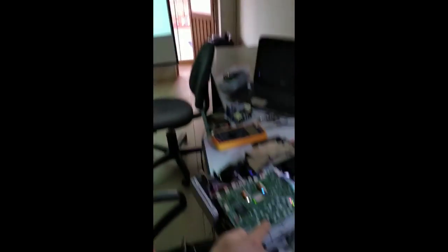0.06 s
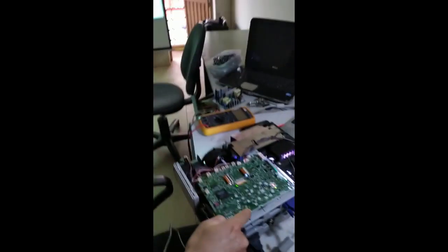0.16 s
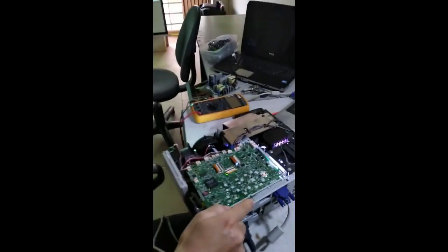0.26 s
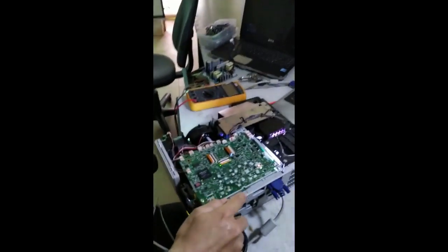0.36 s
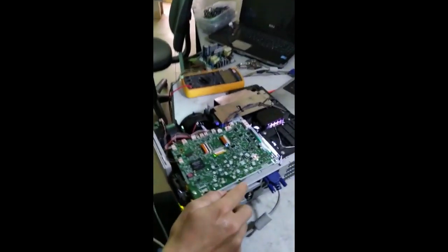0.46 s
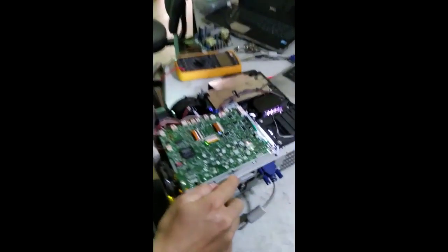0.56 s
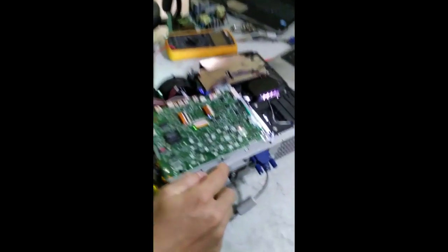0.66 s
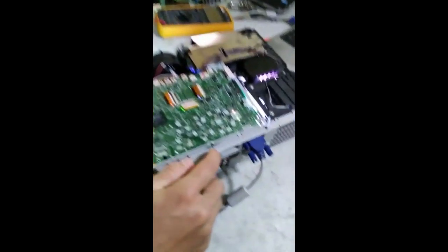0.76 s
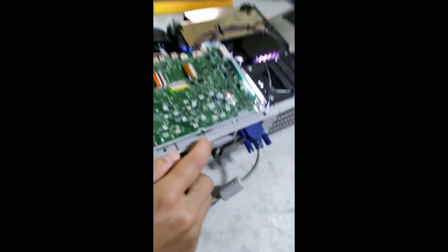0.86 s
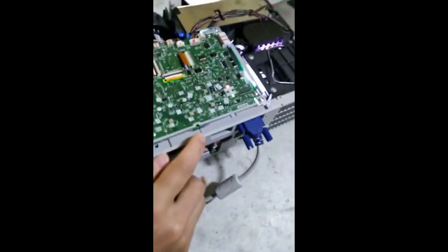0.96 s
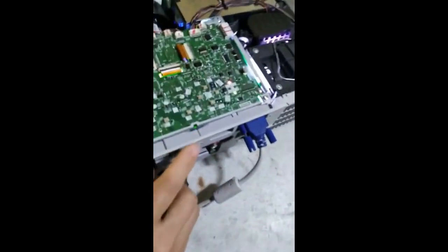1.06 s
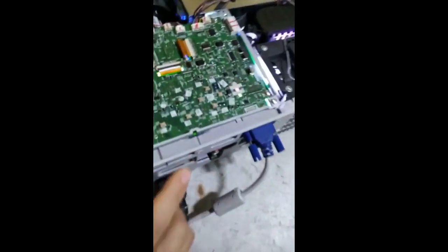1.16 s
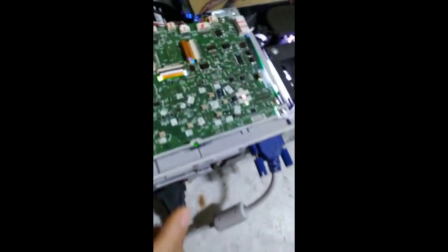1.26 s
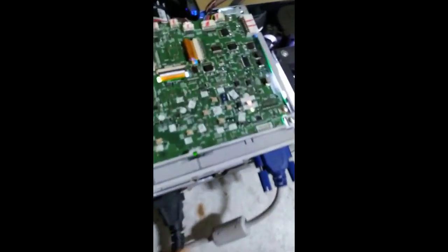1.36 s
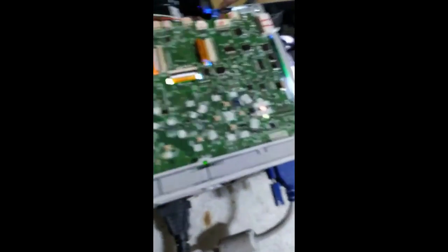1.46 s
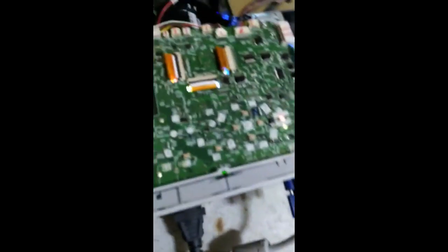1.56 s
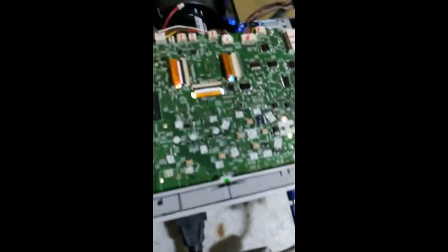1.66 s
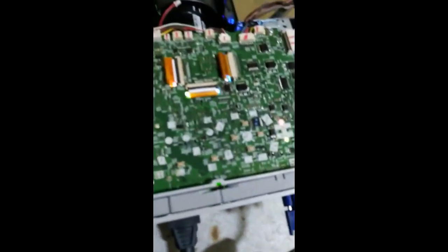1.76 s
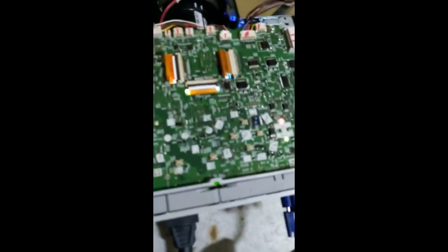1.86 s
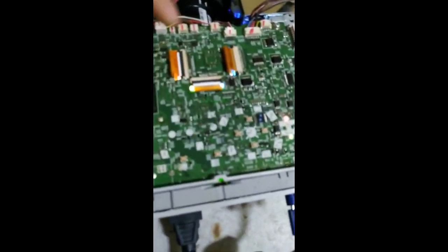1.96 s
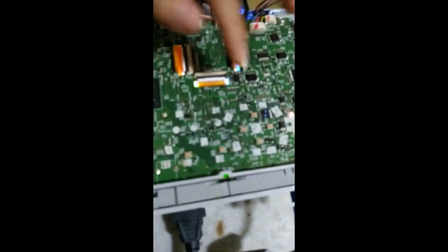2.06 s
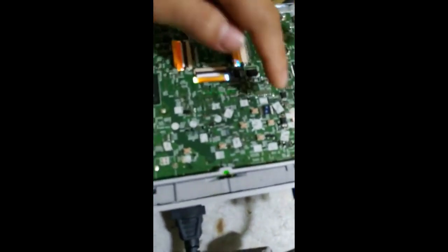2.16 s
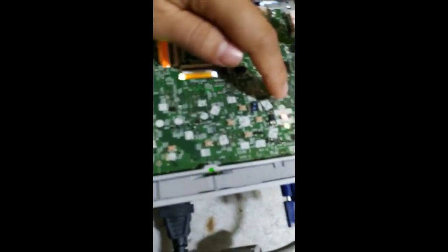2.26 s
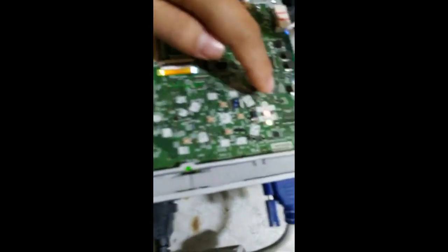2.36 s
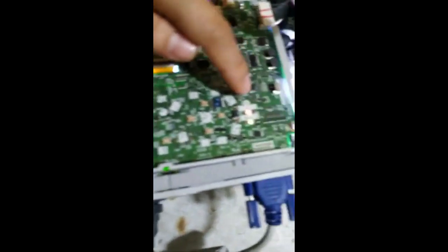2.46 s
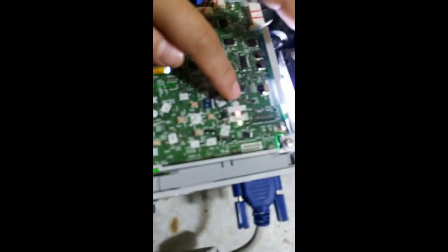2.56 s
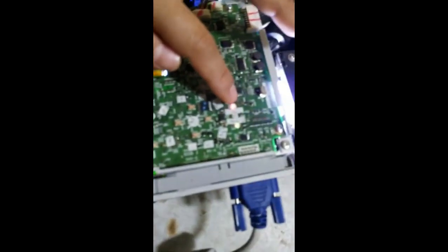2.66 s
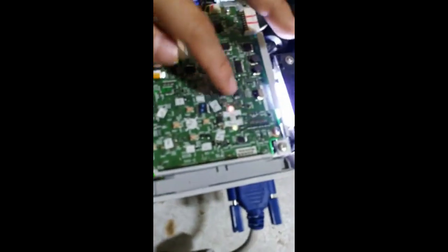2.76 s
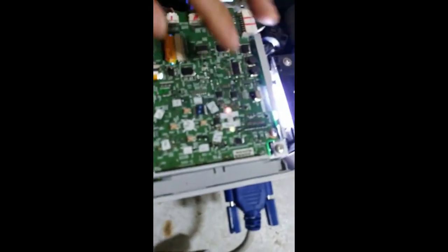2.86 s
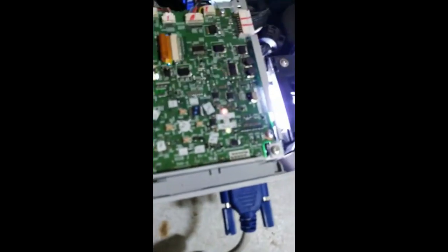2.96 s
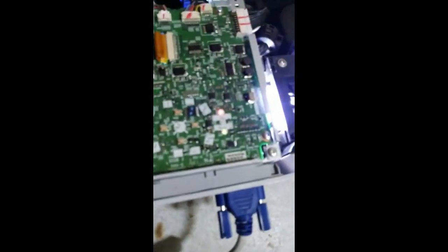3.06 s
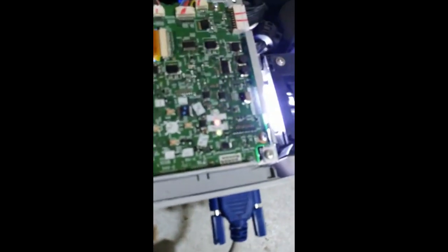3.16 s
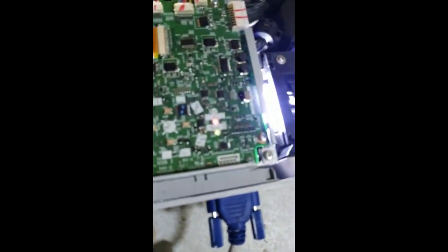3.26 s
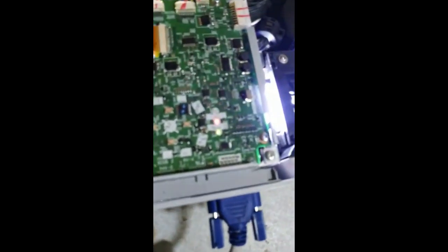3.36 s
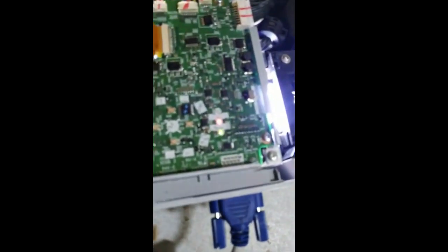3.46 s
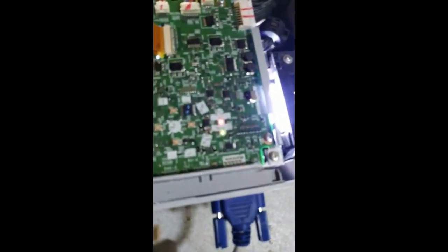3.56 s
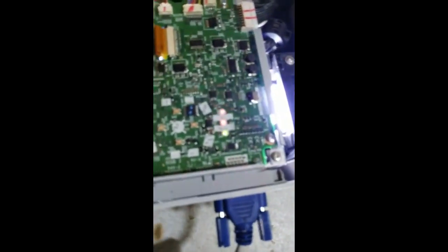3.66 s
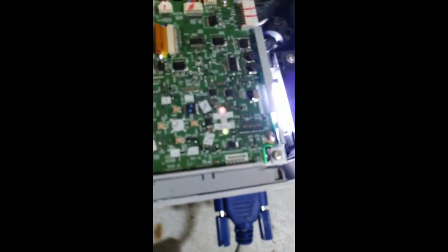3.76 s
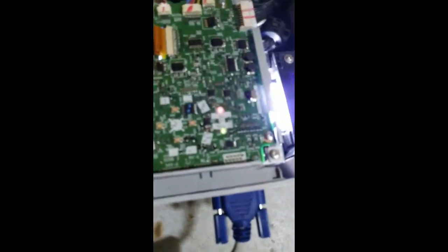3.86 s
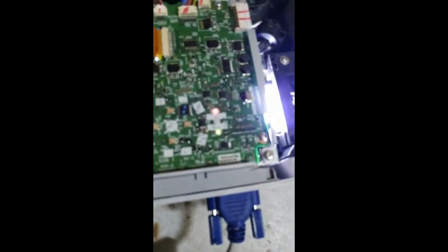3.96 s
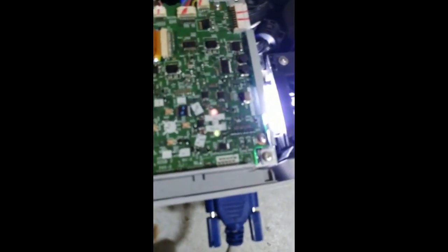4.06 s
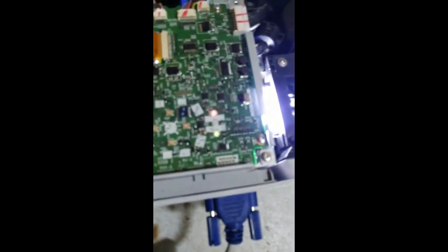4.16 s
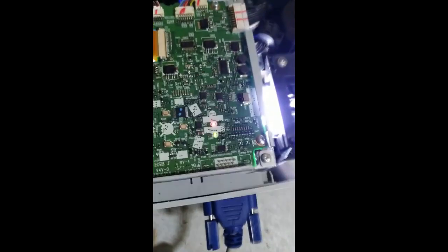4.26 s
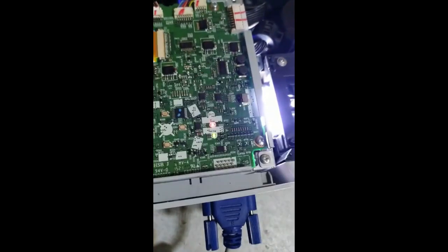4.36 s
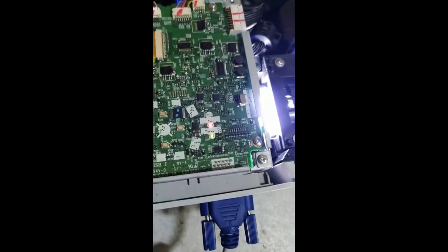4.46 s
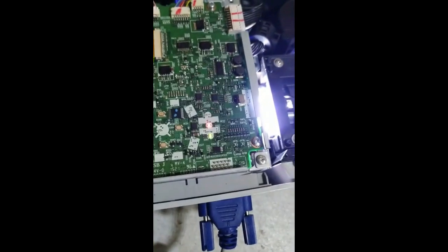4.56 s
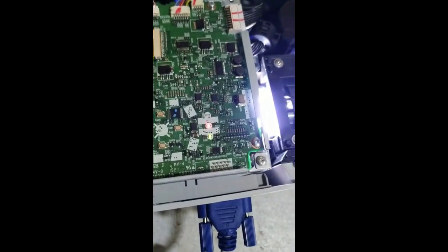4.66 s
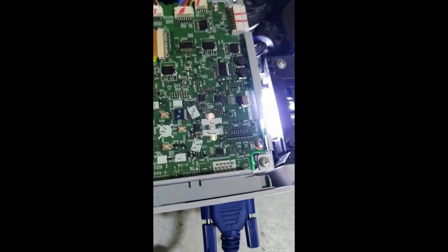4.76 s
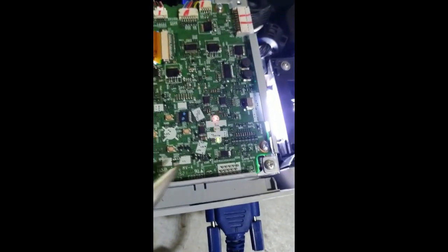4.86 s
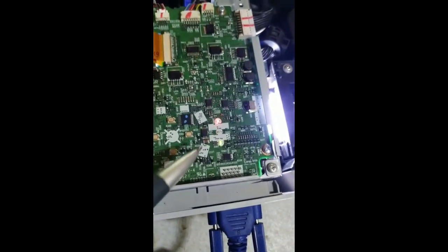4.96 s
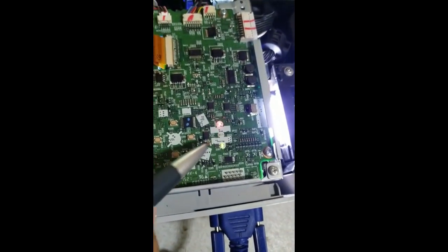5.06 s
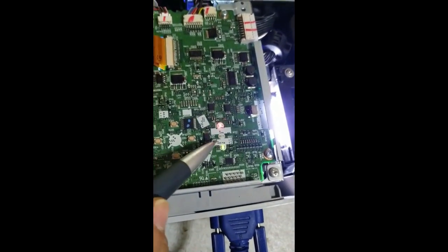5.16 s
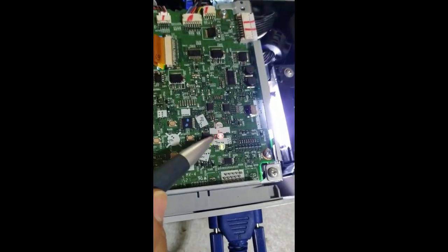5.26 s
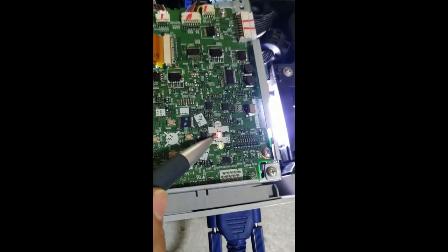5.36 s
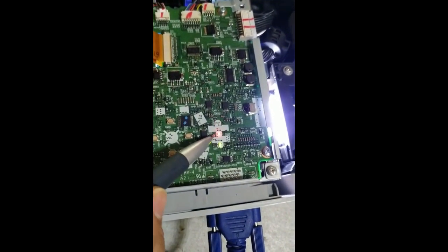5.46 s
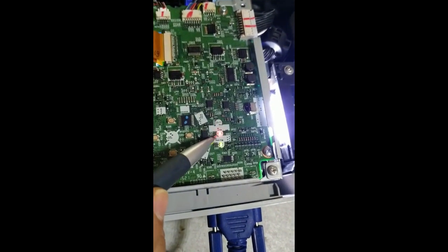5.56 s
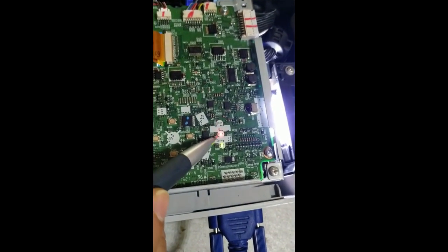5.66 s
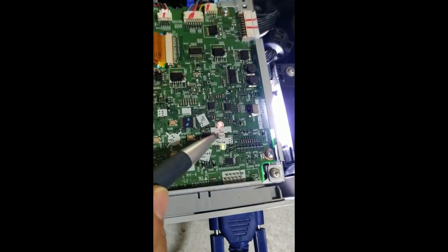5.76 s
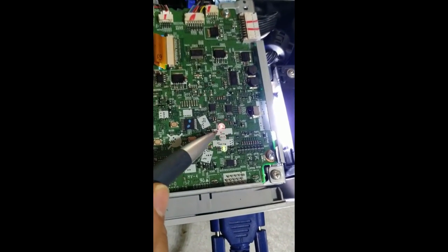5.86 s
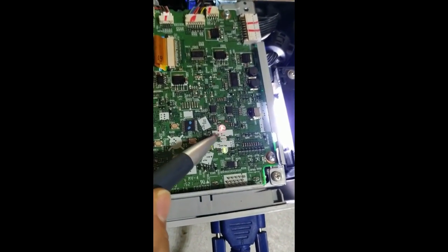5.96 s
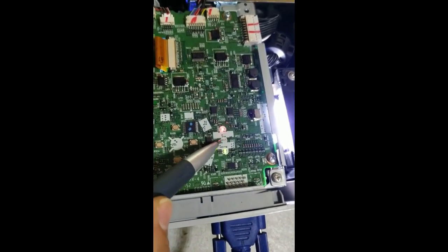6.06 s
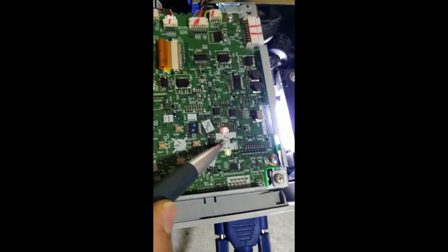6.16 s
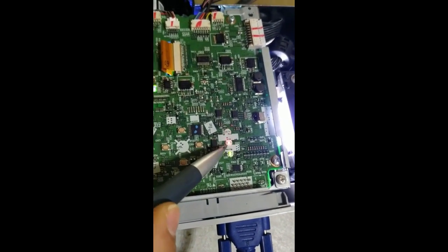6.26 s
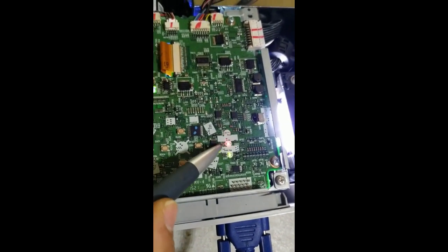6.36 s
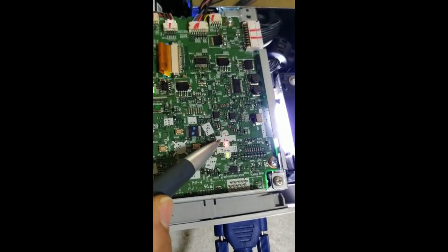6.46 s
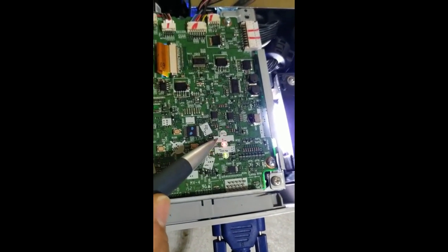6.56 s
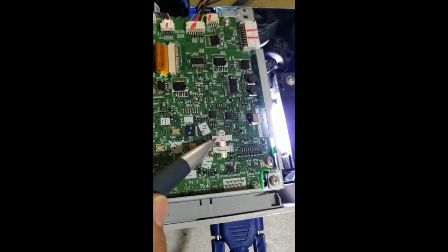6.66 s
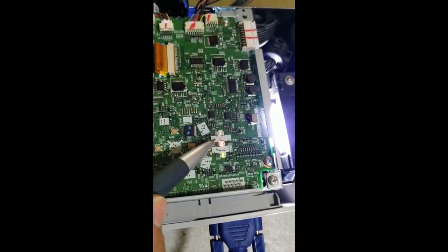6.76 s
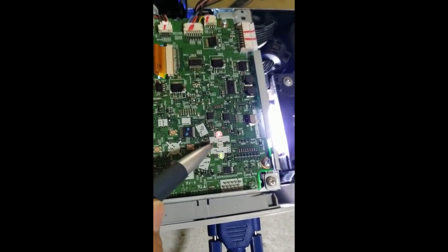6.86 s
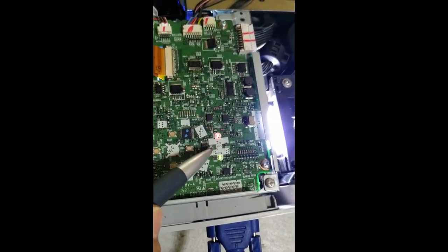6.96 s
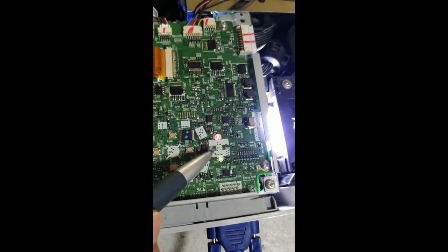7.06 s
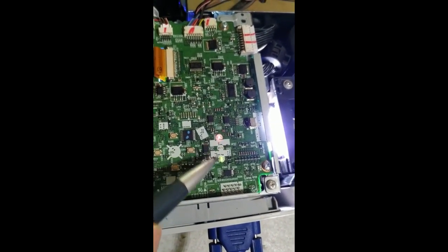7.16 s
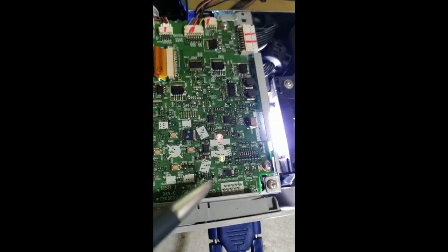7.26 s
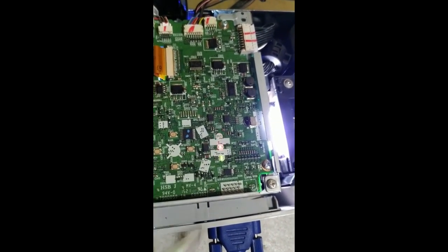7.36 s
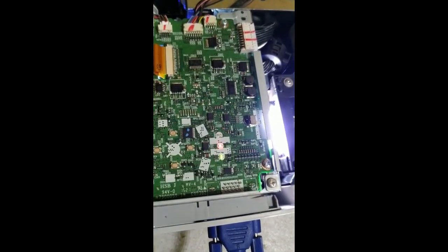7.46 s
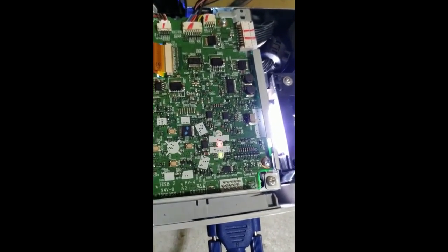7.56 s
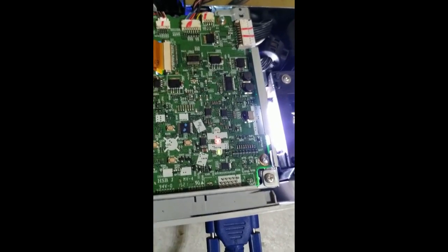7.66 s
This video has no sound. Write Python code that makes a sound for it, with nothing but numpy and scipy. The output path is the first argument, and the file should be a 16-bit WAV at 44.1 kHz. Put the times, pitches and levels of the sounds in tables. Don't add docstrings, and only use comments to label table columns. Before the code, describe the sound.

Steady fan rush and low hum from an opened projector on a bench, a throbbing motor drone swelling, faint ticks and one sharp tool click midway.

```python
import sys
import numpy as np
from scipy import signal
from scipy.fft import irfft, next_fast_len
from scipy.io import wavfile

SR = 44100
rng = np.random.default_rng(int(sys.argv[2]) if len(sys.argv) > 2 else 0)


def boost(x):
    u = np.asarray(x, float) / 20
    return 10 ** u


def unload_audio(sound):
    columns = np.transpose(np.atleast_2d(sound))
    steps = np.round(np.clip(columns, -1, 1) * 32767)
    wavfile.write(sys.argv[1], SR, steps.astype(np.int16))


N = 339966
T = np.arange(N) / SR
SLOW = T[::200]
LONG = next_fast_len(N)


def motor():
    # (time [s], rotation rate [Hz])
    shaft = [(0.0, 17.9), (1.3, 17.978), (2.3, 17.778), (2.9, 18.021), (3.55, 17.712), (4.3, 17.512),
             (4.95, 17.298), (5.22, 16.695), (5.45, 17.309), (6.2, 17.624), (6.8, 17.799), (7.71, 17.928)]
    # (time [s], level [dB], spread [s])
    crests_5 = [(0.69, -52, 0.35), (1.7, -39.5, 0.27), (2.58, -32.1, 0.49), (3.25, -42, 0.11),
                (3.95, -32.5, 0.27), (4.75, -36, 0.28), (5.66, -31.6, 0.37), (7.19, -37, 0.34)]
    crests_6 = [(0.44, -52.5, 0.1), (1.33, -45, 0.37), (2.21, -38, 0.39), (3.06, -46.3, 0.19),
                (3.85, -38, 0.34), (4.47, -42.5, 0.17), (6.02, -39.5, 0.26), (6.84, -44, 0.19)]
    crests_7 = [(1.46, -52.5, 0.65), (2.15, -59, 0.22), (2.92, -46, 0.27), (3.57, -42.5, 0.17),
                (4.33, -36, 0.42), (4.89, -41.5, 0.15), (5.87, -49, 0.51)]
    crests_16 = [(1.25, -52, 0.093), (2.0, -67, 0.27), (3.0, -49.5, 0.16), (3.75, -54, 0.28),
                 (4.6, -53, 0.16), (5.8, -63, .3)]
    crests_17 = [(1.29, -57.5, 0.88), (2.08, -48.5, 0.19), (2.75, -48, 0.12), (3.15, -48.5, 0.11),
                 (3.98, -54, 0.71), (4.87, -52.5, 0.12), (6.29, -50.5, 0.67), (7.42, -53.5, 0.1)]
    crests_18 = [(1.8, -56, 0.13), (2.28, -51, 0.12), (2.95, -53, 0.16), (3.9, -58, 0.42),
                 (5.05, -50.5, 0.079), (6.8, -67.5, .4)]
    # (time [s], phase [turns])
    slip = [(2.35, 0), (2.9, .5), (3.3, .5), (3.75, -.45)]
    weak_overtones = [(4, 5), (8, 6), (11, 6), (14, 6), (15, 6), (19, 18), (20, 17), (21, 18), (22, 18)]
    weak_db = [-18, -17.5, -20, -19, -19.5, -6.5, -16.5, -14.5, -7.5]

    turn = 2 * np.pi * np.cumsum(curves(shaft)[0]) / SR
    crests = {5: crests_5, 6: crests_6, 7: crests_7, 16: crests_16, 17: crests_17, 18: crests_18}
    lead = {k: standing_wave(rows) for k, rows in crests.items()}
    lag = {5: 0, 6: 0, 7: 2 * np.pi * curves(slip)[0],
           16: 0.8 * walk(8), 17: np.pi + 0.8 * walk(8), 18: 0.8 * walk(8)}
    out = sum(lead[k] * np.cos(k * turn + lag[k]) for k in lead)
    for (k, followed), db in zip(weak_overtones, weak_db):
        start = 0 if k in (4, 8) else 2 * np.pi * rng.random()
        level = lead[followed] * boost(db + 1.9 * walk(2.65))
        out += level * np.cos(k * turn + start + 0.81 * walk(2.16))
    return out


def standing_wave(crests):
    level = boost(-65)
    for s, db, spread in crests:
        level = level + boost(db) * bell(s, spread)
    return np.interp(T, SLOW, np.sqrt(2) * level)


def fans():
    # (frequency [Hz], level [dB per Hz])
    air = [(8, -2.5), (40, 6.5), (62, 13), (150, 8), (210, 2), (330, 2), (600, 1), (800, 1), (1250, -4.5),
           (2200, -9.5), (3900, -16), (4150, -20), (11800, -34), (12300, -32.5)]
    # (time [s], air level [dB], turn from duct to grille [0-1])
    near = [(0, -50, 0.15), (.77, -48.5, 0.06), (1.26, -46.5, 0.4), (2.1, -46.5, 0.2), (2.94, -46, .02),
            (3.15, -45.5, 0.5), (4.2, -45.5, 0.5), (5.15, -46.5, 0.7), (6.4, -46.5, 0.64),
            (7.71, -46.5, 0.87)]
    # (multiple of the blade rate, level [dB])
    blade_lines = [(2, -75), (3, -62), (4, -68), (5, -62), (7, -81), (8, -72.5), (9, -79)]

    near_db, turned = curves(near)
    duct_db = -16.5 + turned * (-25 + 16.5)
    grille_db = -41 + turned * (-13.5 + 41)
    tilt_db = 0.36 + turned * (0.89 - 0.36)
    hz_at, db_at = np.transpose(air)
    log_hz = np.log(1 + np.arange(LONG // 2 + 1) * SR / LONG)
    colour = boost(np.interp(log_hz, np.log(hz_at), db_at))

    rush, swell = 0, 0.3 * walk(1.5)
    for hz in 8 * 2 ** np.arange(0, 11.1, 0.5):
        db = 10 * np.log10(hz / 1000) + tilt_db * np.log2(hz / 1000) + swell + 1.17 * walk(9)
        rush = rush + boost(db) * band(hz, hz / 5, colour=colour)
    resonance = boost(duct_db) * band(2717, 210) + boost(grille_db) * band(3700, 260)

    blade_hz = 293.2 + 0.09 * walk(0.98)
    blades = sum(tone(k * blade_hz, db + 0.71 * walk(1.99)) for k, db in blade_lines)
    lines = (blades + steady_tones()) * boost(near_db + 47.0)
    return unit(rush) * boost(near_db + 1.5) + lines + boost(near_db) * resonance


def hits():
    # (time [s], peak level [dB], centre [Hz], width
    # [Hz], 60 dB decay [s])
    finger_ticks = [(.435, -39.5, 6800, 2500, .04), (.619, -42.5, 6470, 1500, 0.034),
                    (1.124, -36.5, 4000, 3000, 0.034), (1.668, -29.5, 8600, 7000, 0.027),
                    (1.678, -45, 8000, 500, .08), (1.683, -34, 7000, 6000, 0.038),
                    (2.51, -31.5, 8500, 6000, .04), (2.585, -47, 11000, 2000, .08),
                    (3.965, -29, 11600, 3500, 0.034), (4.088, -36, 11700, 2500, 0.098),
                    (4.102, -38, 11500, 2500, .07), (4.072, -44, 9500, 600, .1),
                    (4.093, -40, 4000, 1500, 0.071), (4.875, -50, 14000, 1500, .1),
                    (6.819, -53, 7900, 5000, .02), (3.968, -39, 5000, 2500, 0.24),
                    (3.97, -41, 11000, 3500, .2), (1.669, -38, 4500, 2000, 0.034)]
    # (time [s], level [dB], centre [Hz], width [Hz], 60 dB decay [s])
    knocks = [
        (.9, -37, 18, 1.3, 1.5),
        (.92, -45, 36, 12, 1.1),
        (1.025, -40, 490, 45, 0.35),
        (1.684, -41, 750, 60, 0.1),
        (1.686, -48, 1600, 400, .05),
        (3.17, -47.5, 750, 16, 0.54),
        (3.94, -41, 38, 15, .6),
        (3.963, -42, 750, 400, 0.2),
    ]

    direct, t = np.zeros(N), T[:8192]
    for s, db, hz, width, t60 in finger_ticks:
        shape = np.minimum(t / (0.046 * t60), 1) * 1000 ** (-t / t60)
        add(direct, s, boost(db - 8) * shape * band(hz, width, size=len(t)))
    add_tool_click(direct, t)

    tail = T[:SR // 2]
    echo = band(1300, 4000, size=len(tail)) * 1000 ** (-tail / 0.58)
    echo = echo * (tail > 0.004)
    out = direct + boost(-14) * signal.fftconvolve(direct, echo / np.linalg.norm(echo))[:N]

    t = T[:2 * SR]
    for s, db, hz, width, t60 in knocks:
        shape = np.minimum(t / (0.065 * t60), 1) * 1000 ** (-t / t60)
        add(out, s, boost(db + 4.5) * shape * band(hz, width, size=len(t)))
    return out


def add_tool_click(out, t):
    # (frequency [Hz], level [dB], 60 dB decay [s])
    modes = [(3580, -3, .025), (4270, -4, 0.011), (4680, -4.5, .024), (6800, -18, 0.011),
             (9500, -20, 0.052)]
    click_s, click_db = 3.9637, -13.5
    ring = 0
    for hz, db, t60 in modes:
        ring = ring + boost(db) * np.sin(2 * np.pi * (hz * t + rng.random())) * 1000 ** (-t / t60)
    crack = band(3500, 5400, size=len(t)) * np.exp(-t / 0.0033)
    bench = band(1040, 990, size=len(t)) * np.exp(-t / 0.01)
    add(out, click_s, boost(click_db) * (0.25 * ring + 0.18 * crack + 0.099 * bench))
    add(out, click_s + 0.003, boost(click_db - 22) * (ring + 0.74 * crack))


def rustle():
    # (time [s], spread [s], level near 5 kHz [dB], level near 11 kHz against it [dB])
    strokes = [(.02, 0.071, -60.5, -4), (0.398, 0.2, -69, -8), (.97, .06, -67, 2),
               (1.165, 0.022, -46.5, -12.5), (1.22, 0.051, -53.5, -7), (1.43, 0.089, -55, -3.5),
               (1.65, 0.066, -61, -16), (2.12, 0.12, -56, -5), (3.01, 0.057, -57.5, -3.5),
               (3.18, 0.092, -62, -15), (3.6, 0.082, -57, -1), (3.84, 0.11, -54.5, -1), (4.03, .09, -64, 0),
               (4.24, 0.23, -62.5, -3.5), (4.65, 0.055, -67, 2), (4.9, 0.087, -68, -5),
               (7.36, 0.074, -59, -14), (7.51, 0.068, -55.5, -2)]
    hands = 2, 2.5, -59.5, -9.5
    # (frequency [Hz], width [Hz], level against the stroke [dB])
    panels = [(2600, 86, -8.5), (6300, 110, -17.5), (8000, 140, -17)]

    low_power, high_power = 0, 0
    for s, spread, db, bright_db in list(strokes) + [hands]:
        power = boost(2 * db) * bell(s, spread) ** 2
        low_power = low_power + power
        high_power = high_power + power * boost(2 * bright_db)
    low_db = np.interp(T, SLOW, 10 * np.log10(low_power))
    high_db = np.interp(T, SLOW, 10 * np.log10(high_power))

    slips, out = 1.28 * walk(90), 0
    for bright in np.arange(-0.2, 1.5, 0.25):
        stroke_db = low_db + np.clip(bright, 0, 1) * (high_db - low_db)
        db = stroke_db + slips + 0.93 * walk(13) - 6.0
        out = out + boost(db) * band(4500 + 7500 * bright, 1100)
    for hz, width, db in panels:
        out = out + boost(low_db + db + 2.2 * walk(25)) * band(hz, width)
    return out


def steady_tones():
    line_hz = 20.0, 22.5, 497.5, 802, 1183, 1336.5, 9045.5
    line_db = [-55.5, -49, -60, -69.5, -69.5, -66.5, -85]
    return sum(tone(hz + 0.33 * walk(1.91), db + 1.05 * walk(1.83)) for hz, db in zip(line_hz, line_db))


def unit(x):
    return x / np.sqrt(np.mean(x ** 2))


def walk(rate):
    levels = rng.standard_normal(int(N / SR * rate) + 2)
    return 0.99 * np.interp(T * rate, np.arange(len(levels)), levels)


def band(hz, width, size=LONG, colour=1):
    f = np.arange(size // 2 + 1) * SR / size
    shape = np.exp(-0.5 * ((f - hz) / width) ** 2)
    noise = rng.standard_normal(2 * len(f), dtype=np.float32).view(np.complex64)
    wave = irfft(colour * (shape * noise), size)
    return (wave * size / (2 * np.linalg.norm(shape)))[:N]


def tone(hz, db):
    turns = np.cumsum(hz + 0 * T) / SR + rng.random()
    return np.sqrt(2) * boost(db) * np.sin(2 * np.pi * turns)


def bell(s, spread):
    return np.exp(-0.5 * ((SLOW - s) / spread) ** 2)


def curves(table):
    s, *columns = np.transpose(table)
    return [np.interp(T, s, column) for column in columns]


def add(out, s, x):
    i = int(s * SR)
    out[i:i + len(x)] += x[:N - i]


def scene():
    return (motor() + fans() + rustle() + hits())[None]


def roll_off(x):
    return signal.sosfilt(signal.butter(12, 16510, fs=SR, output="sos"), x)


def record(dry):
    hiss = boost(-66) * band(15400, 7200)
    top_cut = signal.ellip(12, 0.2, 80, 15790, fs=SR, output="sos")
    mix = signal.sosfilt(top_cut, dry + hiss)
    return roll_off(mix)


dry = scene()
out = record(dry)
unload_audio(out)
```